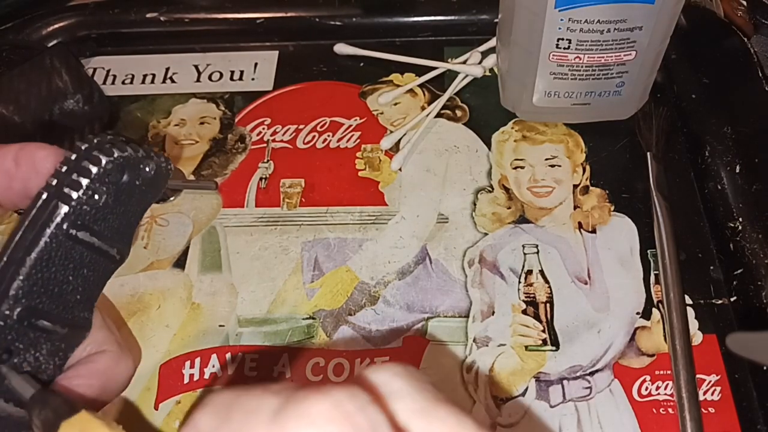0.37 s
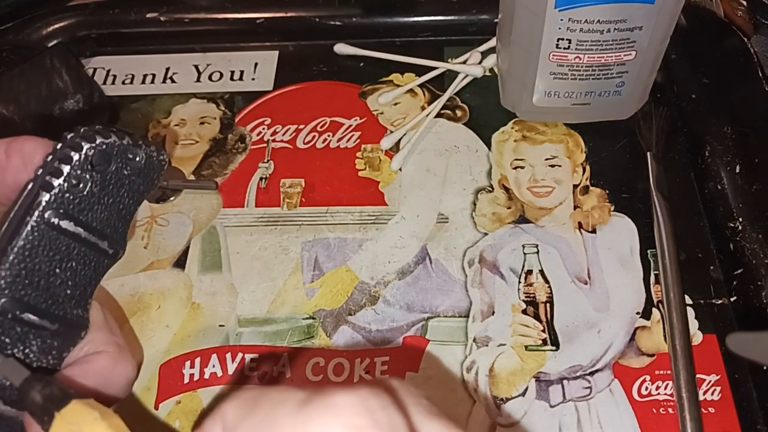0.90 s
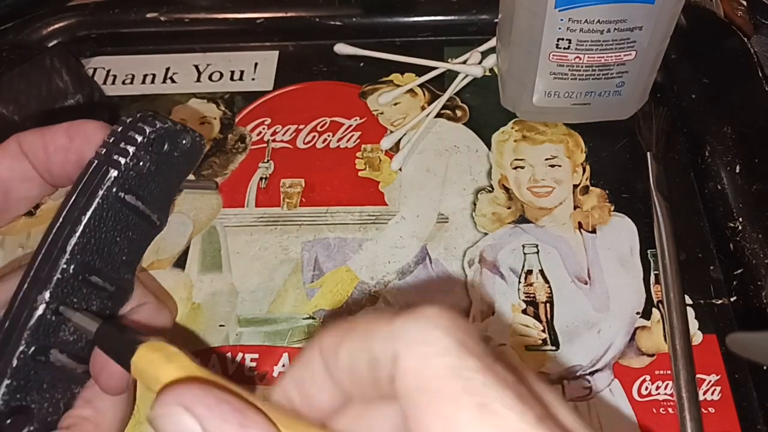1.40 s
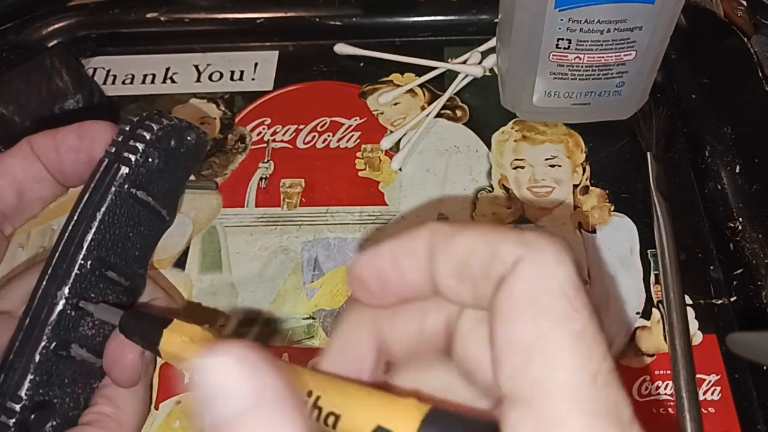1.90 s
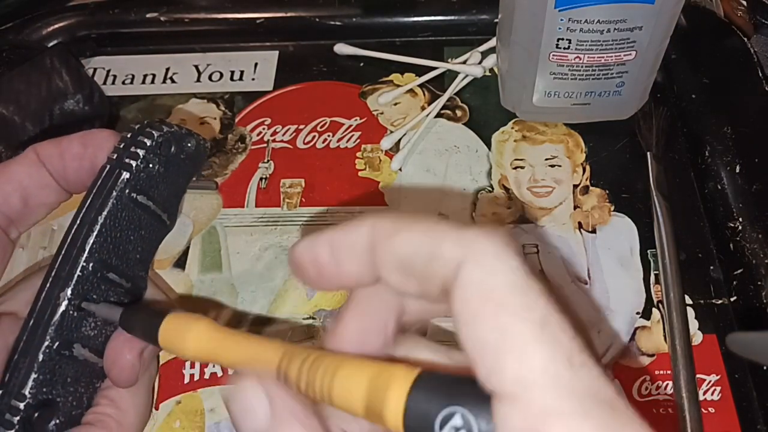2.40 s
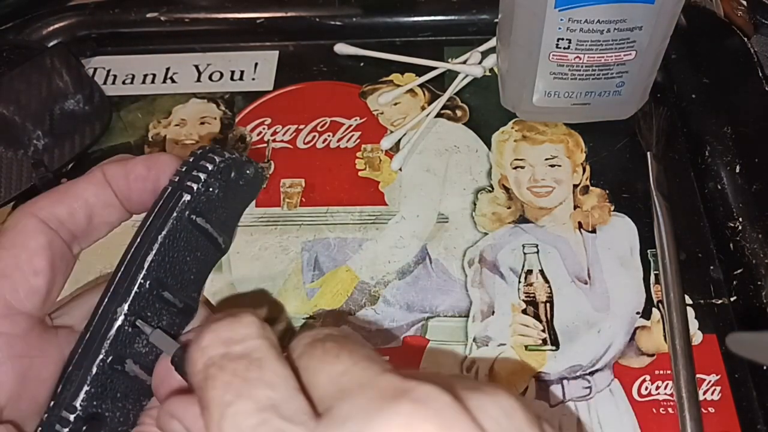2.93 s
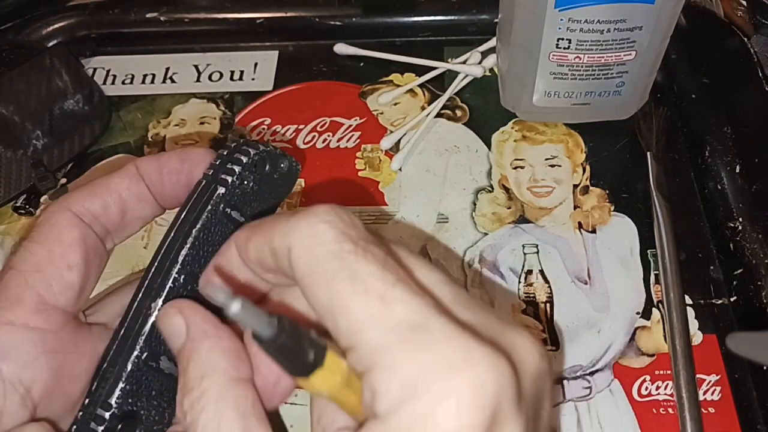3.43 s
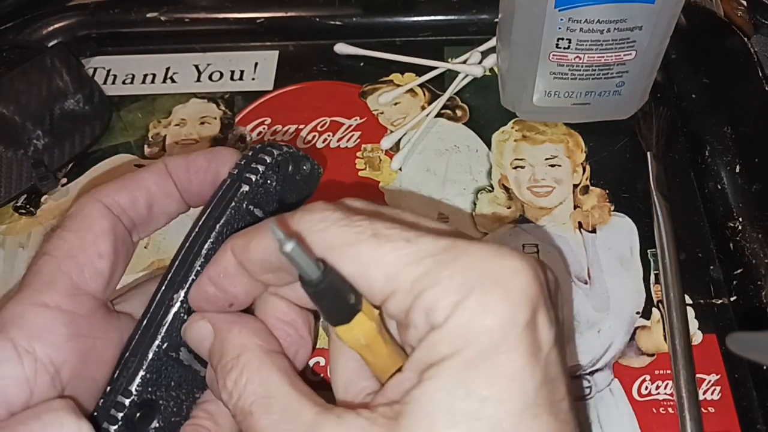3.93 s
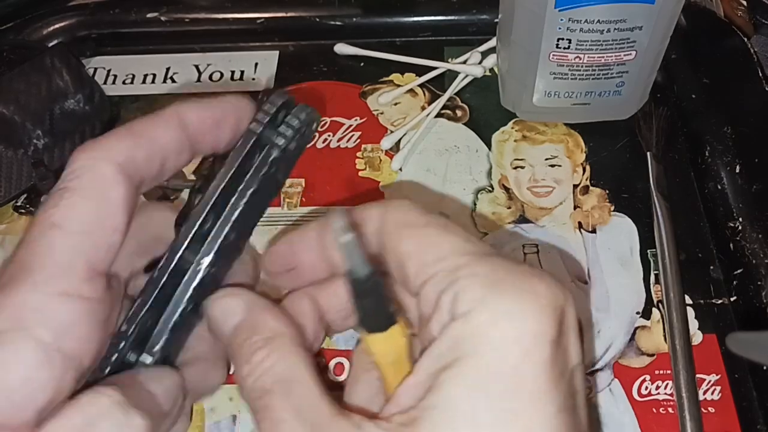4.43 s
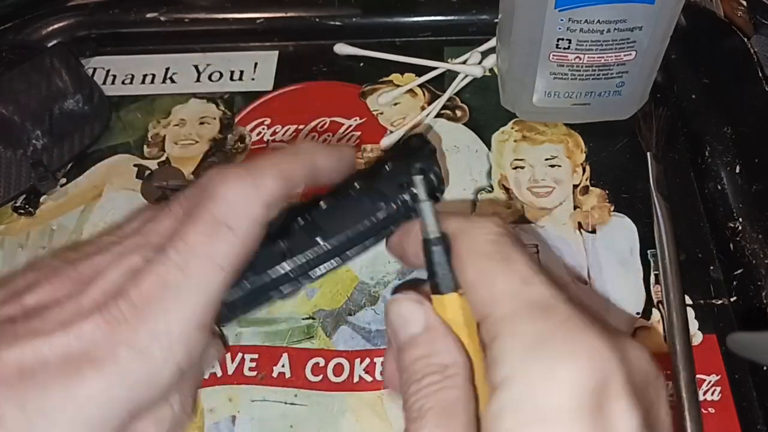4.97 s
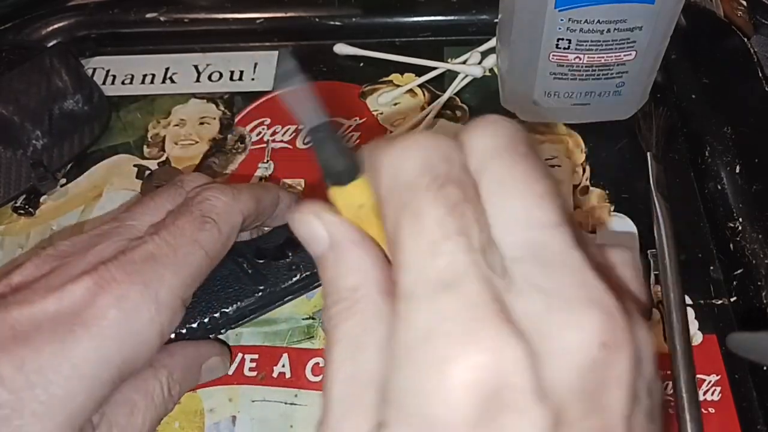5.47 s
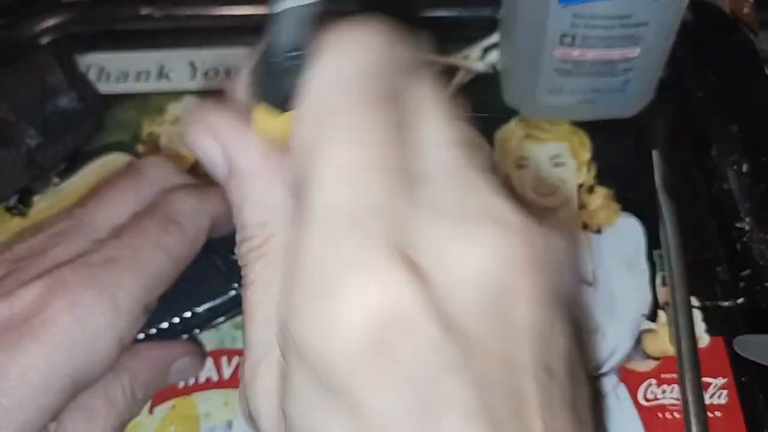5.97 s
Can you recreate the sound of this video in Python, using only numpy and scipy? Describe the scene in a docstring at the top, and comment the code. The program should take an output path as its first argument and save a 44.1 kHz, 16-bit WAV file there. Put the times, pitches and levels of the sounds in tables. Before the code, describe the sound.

A close, quiet indoor scene with a faint steady hiss and a distant low machine drone, with dull floor thumps alternating strong and weak about every 0.6 seconds. From 0 to 3 seconds a small screwdriver works at a knife: light clicks at the start and 0.4, weak ticks and scratches through 0.7 to 1.9, then crisper bright clicks at 2.1, 2.4 and 2.5, with short gritty scrapes and dry finger rubs. From 2.8 to 4.3 it is mostly soft rubbing, with tiny taps near 3.7 and 4.0. At 4.4 the knife is turned with a loose metallic rattle, then knocks down on the tin tray at 4.8 and 4.9 to 5.0 with short hard clatter. Faint rubbing and a barely audible thin hiss follow around 5.5. At 5.9 the loudest sound, a sharp ringing tray clank, then bright clicks and a scrape just after 6.0.

```python
"""A small quiet room, close to a phone: a small screwdriver ticks in the screws of a folding knife held
over a tin tray, and steel scrapes and grinds. Brief contacts and stick-slip noise excite the tool's resonances.
Parts drop on the tray: blows and chatter ring its modes. The knife is turned over with a rattle of decaying
frame modes and laid down hard; fingers rub the handle as shaped noise, and a thin hiss comes once.
A far machine drones, rumbles and thumps through the floor, as wavering sines and noise, over a steady hiss."""
import sys
import numpy as np
from scipy import signal
from scipy.fft import rfft, irfft, next_fast_len
from scipy.io import wavfile
from scipy.ndimage import map_coordinates

SR = 44100
rng = np.random.default_rng(int(sys.argv[2]) if len(sys.argv) > 2 else 0)


def inscribe(sig):
    """Save sig as 16-bit PCM at rate SR to the path in sys.argv[1].

    A 1-D sig is mono; a 2-D sig holds one channel per row.
    Samples are clipped to [-1, 1] before scaling.
    """
    pcm = np.round(np.clip(np.atleast_2d(sig).T, -1, 1) * 32767)
    wavfile.write(sys.argv[1], SR, pcm.astype(np.int16))


def how_loud(loudness_db):
    """Turn decibels into a plain amplitude multiplier (0 dB gives 1, 20 dB gives 10)."""
    steps = np.asarray(loudness_db, float) / 20
    return 10 ** steps


N = 268921  # samples, about 6.1 s


def unit(x):
    """Normalisation: scale to rms 1."""
    return x / np.sqrt(np.mean(x ** 2) + 1e-20)


def along(points, hz):
    """Linear interpolation of (f/Hz, value) points over logarithmic frequency."""
    f, value = np.transpose(points)
    return np.interp(np.log(hz + 1), np.log(f + 1), value)


def filtered(x, response):
    """Linear filtering: the spectrum of x times a complex frequency response."""
    m = 2 * next_fast_len(x.shape[-1] // 2 + 4096)
    spectrum = rfft(x, m) * response(np.fft.rfftfreq(m, 1 / SR))
    return irfft(spectrum, m)[..., :x.shape[-1]]


def causal(points, hz):
    """Minimum-phase response of (f/Hz, level/dB) points, by folding the cepstrum onto positive time."""
    cepstrum = irfft(np.log(how_loud(along(points, hz))))
    cepstrum[1:len(hz) - 1] *= 2
    cepstrum[len(hz):] = 0
    return np.exp(rfft(cepstrum))


def noise(spectrum):
    """Subtractive synthesis: white noise coloured by (f/Hz, level/dB) points, rms 1."""
    return unit(filtered(rng.standard_normal(N), lambda hz: how_loud(along(spectrum, hz))))


def wobble(knots):
    """Slow random modulation: a smooth curve through so many random knots."""
    return map_coordinates(rng.standard_normal(knots), [np.linspace(0, knots - 1, N)])


def grit(n, spread_db):
    """Stick-slip grains: noise with a few much larger jolts."""
    return rng.standard_normal(n) * how_loud(spread_db * rng.exponential(size=n))


def between(modes, lo_hz, hi_hz):
    """Band selection: the modes inside a frequency band."""
    return [m for m in modes if lo_hz <= m[0] < hi_hz]


def resonances(x, modes, scatter_db):
    """Modal superposition: x through causal second-order resonances, each at a new strength."""
    gains = how_loud(scatter_db * rng.standard_normal(len(modes)))

    def body(f):
        total = 0
        for k, ((centre, width, db), gain) in enumerate(zip(modes, gains)):
            resonance = 1j * f * width / (centre * centre - f * f + 1j * f * width)
            total = total + (-1) ** k * gain * how_loud(db) * resonance  # alternating polarity
        return total
    return filtered(x, body)


def ringing(x, modes, scatter_db):
    """Modal superposition normalised to rms 1."""
    return unit(resonances(x, modes, scatter_db))


def strokes(rows):
    """Envelopes that swell, hold and fade: one for the level, one more for each column relative to it."""
    swell, hold, fade_db = 0.12, 0.19, 18  # shares of the length; loss at its end
    out, t = np.zeros((len(rows[0]) - 2, N)), np.arange(N) / SR
    for s, length, db, *relative_db in rows:
        u = (t - s) / max(length, .01)
        fade = np.clip((u - hold) / (1 - hold), 0, None) ** 2
        shape = np.clip(u / swell, 0, 1) * how_loud(-fade_db * fade)
        out += how_loud(db + np.array([0, *relative_db]))[:, None] * shape
    return out


def add(track, s, sound):
    """Superposition: mix a sound into the track at time s."""
    part = track[round(s * SR):][:len(sound)]
    part += sound[:len(part)]


# decay time of the tail, per frequency: f/Hz, t60/s
ROOM_DECAY = [(100, 0.11), (1000, 0.41), (3000, 0.12), (8000, 0.43), (15000, 0.16)]


def room(x):
    """Reverberation as decaying noise, per frequency, under a smooth fade that ends it early."""
    hz, t, z = signal.stft(rng.standard_normal(len(x)), SR, nperseg=256)
    decay = how_loud(-60 * t / along(ROOM_DECAY, hz)[:, None] - (t / 0.025) ** 2)
    tail = signal.istft(z * decay, SR, nperseg=256)[1]
    late = np.pad(x, (180, 0))  # 4 ms
    return signal.fftconvolve(late, tail / np.linalg.norm(tail))[:len(x)]


# spectrum of the room's hiss: f/Hz, relative level per hertz/dB
HISS_SPECTRUM = [(180, -46.5), (300, -5.5), (343, -5.5), (447, -10.5), (486, -14), (749, -16),
                 (1390, -17.5), (2610, -17.5), (4020, -20), (15000, -23.5), (16000, -18.5)]


def hiss():
    """Stationary broadband noise fills the room."""
    return how_loud(-82) * noise(HISS_SPECTRUM)


# spectrum of the machine's dull rumble: f/Hz, relative level per hertz/dB
RUMBLE_SPECTRUM = [(12, -60.5), (20, -16), (41, -0.5), (59, -13), (73, -2), (87, -7), (107, -12),
                   (178, -23.5), (223, -21), (455, -43.5), (700, -45), (910, -46), (1540, -120)]
# a strong and a weak thump in every turn: first t/s, mean envelope level/dB
TURN_THUMPS = [(0.418, -48), (1.023, -57.5)]


def machine():
    """Periodic forcing: a drone of wandering pitch and two thumps per turn, over a steady rumble."""
    turn_s, thump_hz, rise_s, fall_s = 1.252, 63.6, 0.031, .07
    t = np.arange(N) / SR
    drone_hz = 59 + 6 * wobble(knots=160)
    drone = np.sqrt(2) * np.sin(2 * np.pi * np.cumsum(drone_hz) / SR)
    drone = how_loud(-64 + 2 * wobble(knots=90)) * drone
    thumps = np.zeros(N)
    for first_s, db in TURN_THUMPS:
        late = (t - first_s + turn_s / 2) % turn_s - turn_s / 2  # s from the nearest thump
        swell = np.exp(-(late / np.where(late < 0, rise_s, fall_s)) ** 2)
        thumps += how_loud(db + wobble(knots=12)) * swell * np.sin(2 * np.pi * thump_hz * late)
    return drone + thumps + how_loud(-66.5) * noise(RUMBLE_SPECTRUM)


# knocks on the loose knife frame: t/s, level/dB, favoured f/Hz, share of the free ringing time
FRAME_KNOCKS = [(3.658, -54, 1350, 0.65), (3.931, -51, 945, .6), (4.047, -48.5, 945, 0.87),
                (4.401, -50, 1400, .5), (4.418, -40, 1400, .6), (4.776, -37, 865, 0.68),
                (4.912, -53, 865, 0.63), (4.935, -33.5, 2600, 0.76), (5.017, -40.5, 1350, 0.52)]
# modes of the frame when left free: f/Hz, mean level/dB, t60/s
FRAME_MODES = [(432, -14.5, 0.25), (865, 2, 0.093), (945, 1, 0.032), (1350, -6, 0.17), (1427, -2, .05),
               (1960, -4, 0.052), (2330, -11.5, .06), (2630, 0.5, 0.017), (2620, -6, 0.034),
               (3300, -25, 0.063), (3600, -24, 0.045), (4040, -17, 0.074), (4800, -20, 0.076)]


def knocks():
    """Impulse response of a damped frame: all modes ring, most of all those that the grip leaves free."""
    favour_db, favour_octaves = 10, .1
    out, t = np.zeros(N), np.arange(SR // 4) / SR
    hz, level_db, t60 = np.transpose(FRAME_MODES)[..., None]
    for s, db, free_hz, share in FRAME_KNOCKS:
        free_db = favour_db * np.exp(-(np.log2(hz / free_hz) / favour_octaves) ** 2)
        chance = rng.standard_normal((2, len(FRAME_MODES), 1))  # strength and phase
        start_db = level_db + free_db - favour_db + 2 * chance[0]
        ring = how_loud(start_db - 60 * t / (max(share, .1) * t60))
        # loose parts blur each pitch
        drift = np.cumsum(rng.standard_normal((len(FRAME_MODES), len(t))), axis=1) * .045
        ring = ring * np.sin(2 * np.pi * hz * t + chance[1] + drift)
        ring = ring.sum(axis=0) * (1 - np.exp(-t / .0008))  # soft onset
        add(out, s, how_loud(db) * (ring + how_loud(-8.5) * room(ring)))
    return out


# landings on the tray: t/s, peak level before the room/dB, hardness (level at 2.5 kHz)/dB,
# sizzle (level at 6.5 kHz)/dB, base t60/s
LANDINGS = [(0.015, -58, -22, -42, 0.35), (3.658, -49, -16, -54, 0.27), (3.931, -46, -6, -62, 0.15),
            (4.045, -49.5, -11, -58, 0.25), (4.4, -30.5, -4, -28.5, 0.12), (4.471, -47.5, 2.5, -41, 0.23),
            (4.774, -25.5, 3.5, -25, 0.07), (4.911, -45.5, -11, -23, 0.15), (4.933, -33, 3.5, -17.5, 0.042),
            (4.975, -56, -18, -21, 0.061), (5.016, -36.5, 2, -62, 0.044), (5.882, -14.5, -2.3, -16, 0.18)]
# modes of the tray: f/Hz, width/Hz, mean level/dB
TRAY_MODES = [(90, 6, 1.5), (147, 106, 7.5), (198, 50.4, 8.5), (259, 34, 8.5), (464, 224, -2.5),
              (627, 97, 2), (888, 79, -4), (1012, 54, 0.5), (1415, 380, -3.5), (1780, 110, -2),
              (1996, 68, -2.5), (2410, 214, -0.5), (2812, 160, -0.5), (3214, 120, -7.5), (3560, 160, 2),
              (3600, 1300, -7.5), (5270, 120, -7), (5990, 1000, -9.5), (7660, 1260, 3.5),
              (10000, 2400, -8.5), (14100, 1300, -3.5)]


def drops():
    """Impact excitation: a blow and a dying chatter drive the tray's modes; high modes die first."""
    out, t = np.zeros(N), np.arange(SR // 3) / SR
    edges_hz, lives = [0, 500, 1700, 5500, SR], (1.56, 1.115, 0.99, 0.68)  # lives: t60 factor of each band
    scatter_db, spread_db = 2, 2
    for s, db, hardness_db, sizzle_db, t60 in LANDINGS:
        boom_db = -19 + 62.5 * t60  # a sheet left free to ring long also booms more
        deep_db = boom_db - 6.5 + 0.18 * (db + 8.5)  # only a heavy blow moves the whole sheet
        bright_db = 3.0 * hardness_db + 0.29 * sizzle_db + 5.0
        colour = [(120, deep_db), (350, boom_db), (950, 0), (2500, hardness_db), (5000, bright_db),
                  (6500, sizzle_db), (15000, sizzle_db - 10)]
        chatter = grit(len(t), spread_db)
        chatter[0] = 12  # first contact
        hit = np.zeros(len(t))
        for k, life in enumerate(lives):
            decay = how_loud(-60 * t / (max(t60, .01) * life))
            shake = chatter * (decay + 0.05 * how_loud(-60 * t / 0.016))
            hit += resonances(shake, between(TRAY_MODES, edges_hz[k], edges_hz[k + 1]), scatter_db)
        hit = filtered(hit, lambda hz: causal(colour, hz))
        add(out, s, how_loud(db) * (hit + how_loud(-12.5) * room(hit)) / np.abs(hit).max())
    return out


# the thin hiss near 5 kHz: start t/s, length/s, level/dB
SQUEAL_STROKES = [(5.48, 0.36, -80)]


def squeal():
    """Narrow-band noise under a stroke envelope: a thin hiss near 5 kHz."""
    band = [(4300, -29), (4900, -5.0), (5150, -1.0), (5400, -11.0), (6000, -43.0)]
    return strokes(SQUEAL_STROKES)[0] * noise(band)


# fingers sliding on the handle: start t/s, length/s, level/dB, dry crackle relative to it/dB
FINGER_RUBS = [(0.0, 0.15, -86, 1.5), (.41, 0.12, -74.5, 1.5), (.7, 0.11, -84, -2), (.8, 0.089, -88.5, 6),
               (.875, .09, -85, -7), (.98, 0.13, -91, -5), (1.36, 0.44, -90, -9), (1.78, 0.32, -89, 3.5),
               (2.112, 0.15, -73, 2), (2.398, 0.11, -79, 4.5), (2.46, 0.14, -78, 4), (2.64, 0.23, -86.5, 3),
               (2.84, 0.24, -80, -2.5), (3.03, 0.24, -90, 1), (3.27, 0.29, -84.5, 0), (3.52, 0.16, -99, 17),
               (3.6, 1, -89, -7), (4.43, 0.26, -75.5, -5.5), (4.61, 0.3, -68.5, -13),
               (4.72, 0.057, -74.5, -14), (4.79, 0.14, -66, -20), (4.93, 0.26, -78.5, -5.5),
               (5.255, 0.093, -82.5, -1), (5.28, 0.63, -87.5, -1), (5.5, 0.44, -89.5, -3),
               (6.044, 0.047, -59.5, 8.5)]
# spectrum of skin on the handle: f/Hz, relative level per hertz/dB
SKIN_SPECTRUM = [(300, -2.5), (1000, -5.5), (3500, -9), (6300, -22), (7000, -8), (7800, -5), (8800, -12.5),
                 (10000, -19.5), (13000, -33), (16500, -59.5)]
# spectrum of the dry crackle of any contact: f/Hz, relative gain/dB
DUST_SPECTRUM = [(1500, -13.5), (4000, -1.5), (9000, -16.5), (11000, -11.5), (15000, -3), (16500, -54.5)]


def rubbing(slips):
    """Sliding friction: fingers on the rough handle make fluctuating noise and a dry crackle of slips."""
    rub, dryness = strokes(FINGER_RUBS)
    dust = unit(filtered(slips, lambda hz: how_loud(along(DUST_SPECTRUM, hz))))
    return dryness * dust + rub * how_loud(3.8 * wobble(knots=200)) * noise(SKIN_SPECTRUM)


# modes in which knife and driver ring together: f/Hz, width/Hz, relative level of one pass/dB
TOOL_MODES = [(741, 430, 8.5), (1350, 100, 0.5), (2130, 230, -4), (2957, 650, 1), (4160, 1550, -6),
              (5100, 350, 3.5), (6170, 760, 6.5), (7260, 230, 7.5), (7720, 300, 5.5), (8860, 2100, 1),
              (10280, 90, -3), (10450, 1200, 3.5), (12200, 600, -7), (14100, 730, -12)]


def knife(x, scatter_db):
    """Cascaded resonance: two passes through the knife's main modes leave deep valleys between them."""
    modes = between(TOOL_MODES, 1800, 4600)
    return ringing(resonances(x, modes, 0), modes, scatter_db)


# steel scraping on the knife: start t/s, length/s, level/dB, shank singing relative to it/dB
STEEL_SCRAPES = [(0.0, 0.19, -82.5, -16), (.422, 0.044, -77, -12), (.69, 0.056, -72, -17),
                 (.8, 0.051, -91, 4), (.87, .08, -89, 1), (1.35, 0.25, -84.5, -21), (1.78, 0.12, -81.5, -1),
                 (1.865, 0.15, -91, -6), (2.113, .13, -75, 5.5), (2.4, 0.076, -77, 0),
                 (2.43, 0.058, -73.5, -5), (2.462, 0.048, -64.5, 3), (2.66, 0.14, -81.5, -4),
                 (2.78, 0.11, -84.5, -16), (2.86, 0.15, -80.5, -16), (3.045, 0.071, -82.5, -22),
                 (3.3, .18, -92, -11), (3.72, 0.24, -88, -20.5), (4.44, 0.1, -72.5, -10),
                 (4.63, 0.21, -94, 16), (4.78, 0.13, -74.5, -2.5), (4.945, 0.15, -70, -24),
                 (5.864, .04, -61.5, 13), (6.044, .07, -67, 9)]


def scraping(slips):
    """Friction-driven resonance: slips of steel scraping on the knife grind in its modes; the shank sings."""
    scrape, song = strokes(STEEL_SCRAPES)
    grind = how_loud(-6.5) * ringing(slips, between(TOOL_MODES, 0, 1800), 0)
    for centre, width, db in between(TOOL_MODES, 1800, 4600):
        mode = [(centre, width, 0)]
        grip = how_loud(1.76 * db + 1.7 * wobble(knots=90))  # each mode comes and goes as the grip shifts
        grind = grind + grip * ringing(resonances(slips, mode, 0), mode, 0)
    shrill = ringing(slips, between(TOOL_MODES, 4600, 6600), 0)
    return scrape * grind + song * shrill


def friction():
    """Stick-slip: one train of slips feeds both the scraping steel and the dry crackle of the fingers."""
    slips = how_loud(2.5 * wobble(knots=600)) * grit(N, 1.5)  # slips swell about 100 times a second
    return rubbing(slips) + scraping(slips) + squeal()


# bit against screw: t/s, peak level of the knife's main modes/dB, handle and steel settings/dB
# (offset for each band in ticks), contact time/ms
BIT_TICKS = [(0.0471, -40, -18.5, -50, 0.79), (0.4227, -43, -24, -6, 1.8), (0.4286, -40.5, -20, -9.5, 4.2),
             (0.6955, -60.5, -8, -20, 1.2), (0.7118, -52, -14, -8, 0.47), (0.7258, -67, -2, -16, 3.9),
             (0.7966, -63, -15, -7, 1.6), (0.8181, -60, -18, -0.5, 2.9), (0.8842, -62, -17, -3.5, 2.04),
             (1.0116, -63.5, -14.5, -24, 1.6), (1.4007, -65.5, -15, -23, 1.4), (1.731, -57, -18, -38, 0.29),
             (1.8093, -62, -32, -15, 3.1), (1.9021, -53.5, -29, -5, 1.2), (1.9134, -62.5, -10, -1, 1.1),
             (2.1146, -30.5, -24.5, -8, 1.05), (2.1424, -52.5, -10, -9, 0.57), (2.182, -55.5, -15, -6, 5.7),
             (2.1934, -53.5, -37, 5, 2), (2.261, -67.5, -22, -4, 1.9), (2.371, -70, -22, -25, 2.9),
             (2.3991, -34, -20, -13, 0.99), (2.4644, -65, -15, -4, 3.8), (2.4804, -50, -33, -9, 1),
             (2.4892, -41, -14, 2, 1.4), (2.5228, -58, -11, -3, 1.5), (2.6335, -74, -15, 7.5, 1.5),
             (2.6837, -57, -37, -22, 1.5), (2.7356, -63, -15, -14, 2.8), (2.8486, -70.5, 0.5, -3, 0.61),
             (3.5282, -80.5, -15, 20, 3.7), (3.5433, -63.5, -48, 21.5, 0.96), (3.5477, -59, -49, 11.5, 0.9),
             (4.0926, -77, 14, -20, 4.5), (4.362, -66.5, -19, -12, 5.3), (5.5014, -57.5, -14, -10, 3.6),
             (5.8624, -27.5, -15.5, 6, 1.36), (5.8668, -35.5, -16, 5.5, 4.3),
             (6.044, -30.5, -12.5, 1.5, 2.5), (6.0954, -28, -11, -2.5, 1.5)]


def ticks():
    """Impact excitation: a brief contact rings handle, knife, shank and tip; the tray below echoes."""
    out, t = np.zeros(N), np.arange(SR // 4) / SR
    scatter_db = 1.5
    handle = between(TOOL_MODES, 0, 1800)
    shank = between(TOOL_MODES, 4600, 9000)
    tip = between(TOOL_MODES, 9000, SR)
    for s, db, handle_db, steel_db, ms in BIT_TICKS:
        u = 1000 * t / max(ms, .2)
        contact = u * np.exp(-2.2 * u * u) * grit(len(t), scatter_db)
        tick = knife(contact, scatter_db)
        tick = tick / np.abs(tick).max()
        size = np.sqrt(np.mean(tick ** 2))  # the other parts are set against the knife's rms
        tick = tick + size * how_loud(handle_db + 5.0) * ringing(contact, handle, scatter_db)
        tick = tick + size * how_loud(steel_db + 3.0) * ringing(contact, shank, scatter_db)
        tick = tick + size * how_loud(steel_db - 5) * ringing(contact, tip, scatter_db)
        echo = how_loud(-19) * np.roll(tick, round(SR / 80))  # 12 ms late
        add(out, s, how_loud(db) * (tick + echo + how_loud(-25.0) * room(tick)))
    return out


def scene():
    """Level-difference panning: the hands a little left of the phone, the machine slightly left."""
    hands = (ticks() + friction()) * how_loud([[.6], [-.6]])
    far_machine = machine() * how_loud([[.12], [-.12]])
    return hands + drops() + knocks() + far_machine + hiss()


def band_limit(x):
    """A steep low-pass at the top of the band."""
    return signal.sosfilt(signal.butter(12, 16380, fs=SR, output="sos"), x)


# unlike part of the two ports: f/Hz, level relative to the common sound/dB
PORT_DIFFERENCE = [(100, -38), (300, -29), (700, -28), (1500, -29), (3000, -27), (6000, -23), (14000, -19)]
# spectrum of the hiss that is opposite in the two ports: f/Hz, relative level per hertz/dB
SIDE_HISS_SPECTRUM = [(15, -67), (25, -8.5), (64, 0.5), (175, -11.5), (223, -2), (451, -23), (489, -18.5),
                      (659, -26), (4030, -26), (16000, -26.5)]


def record(dry):
    """Diffraction at two close ports: nearly the same sound in both, with a little opposite scatter and hiss."""
    mid = dry.mean(axis=0)
    scatter = np.exp(-np.arange(2000) / 150) * rng.standard_normal(2000)  # paths around the phone's body
    scatter = scatter / np.linalg.norm(scatter)
    apart = filtered(mid, lambda hz: how_loud(along(PORT_DIFFERENCE, hz)) * rfft(scatter, 2 * len(hz) - 1))
    side = apart + how_loud(-85.5) * noise(SIDE_HISS_SPECTRUM)
    return band_limit(dry + [side, -side])


dry = scene()
out = record(dry)
inscribe(out)
```